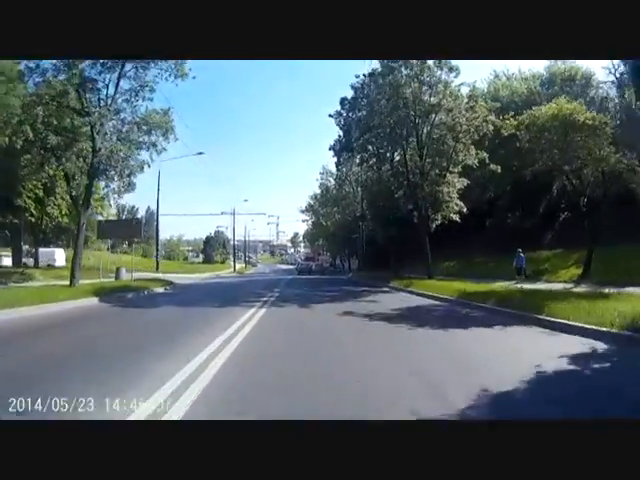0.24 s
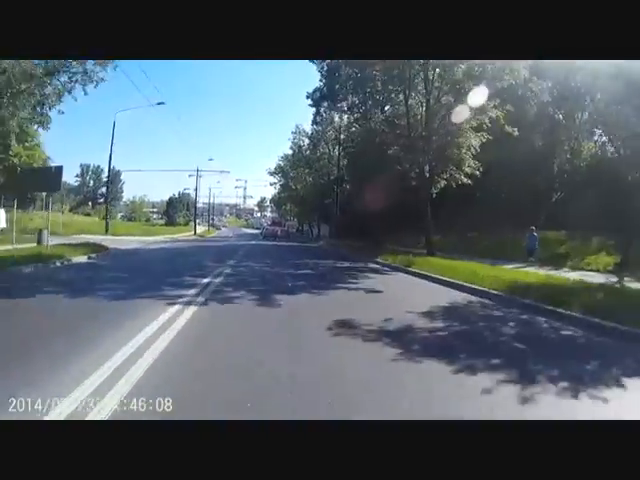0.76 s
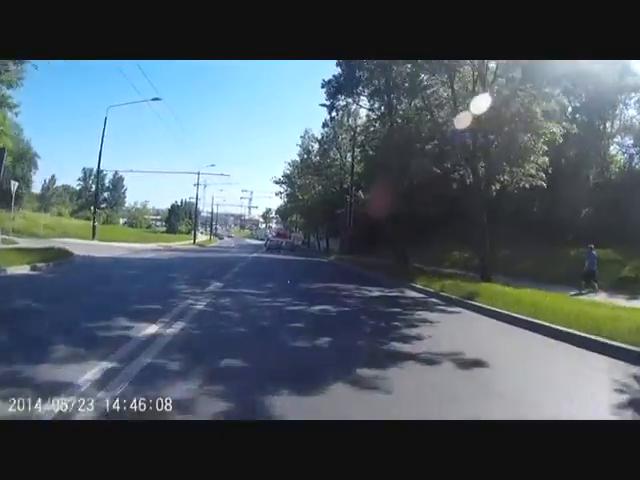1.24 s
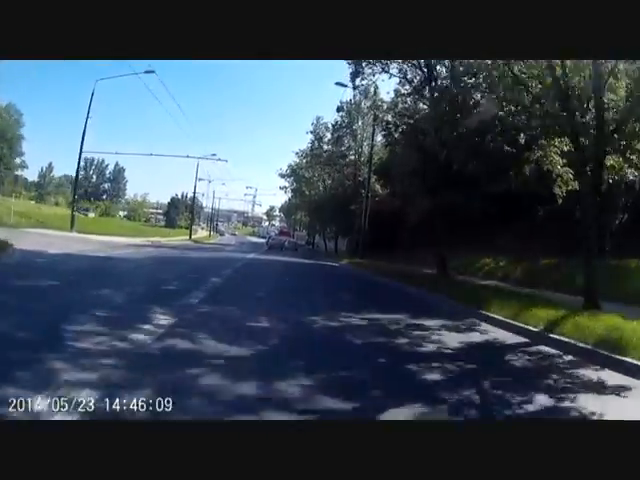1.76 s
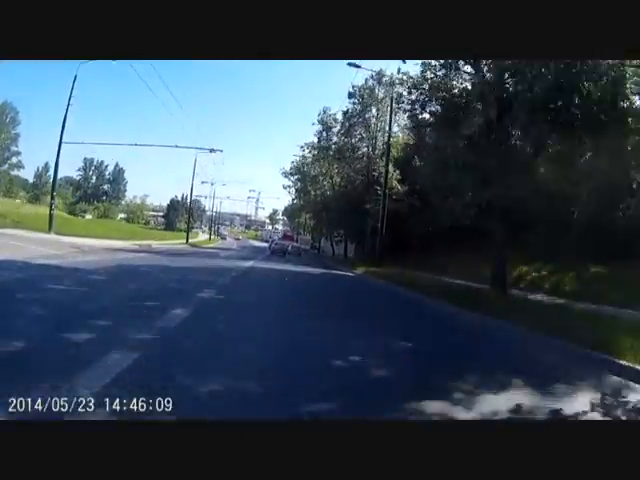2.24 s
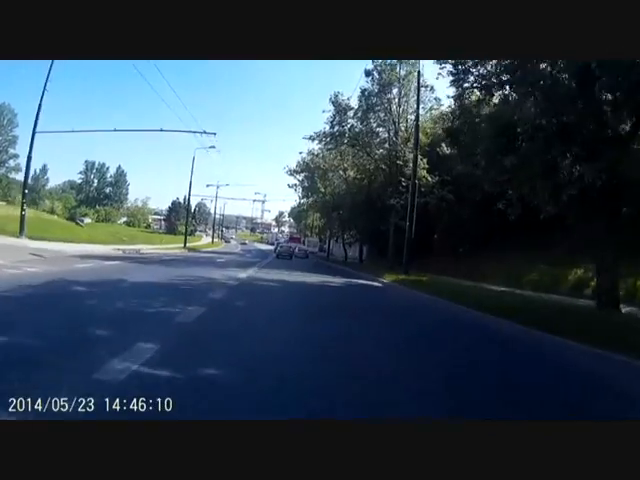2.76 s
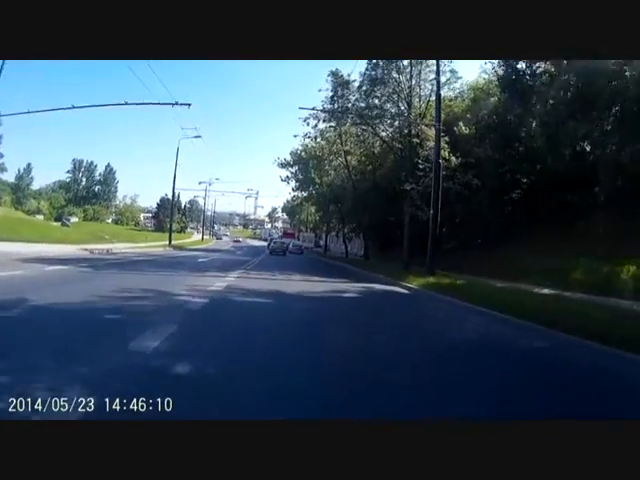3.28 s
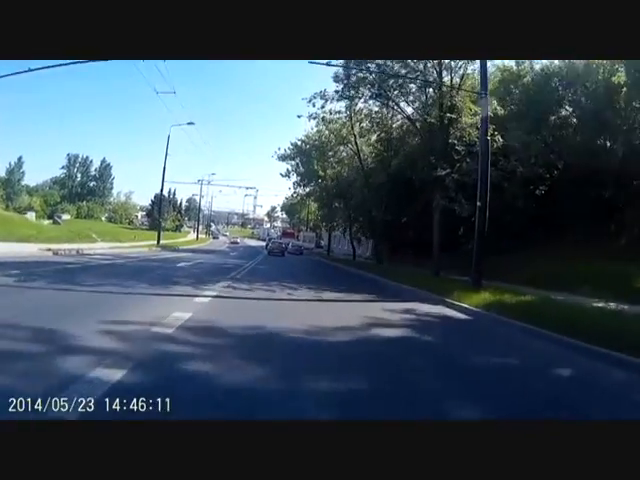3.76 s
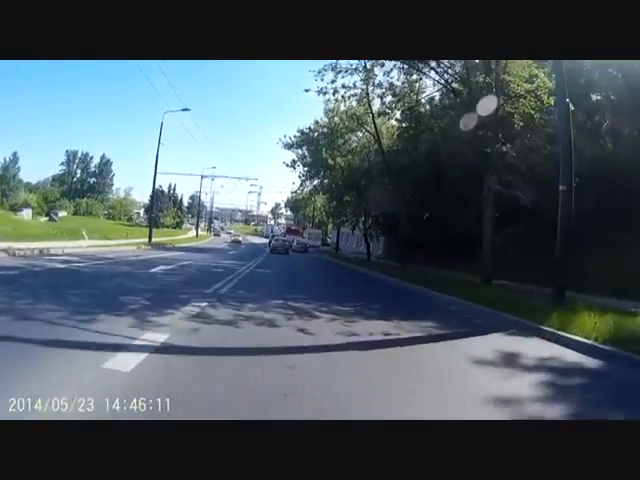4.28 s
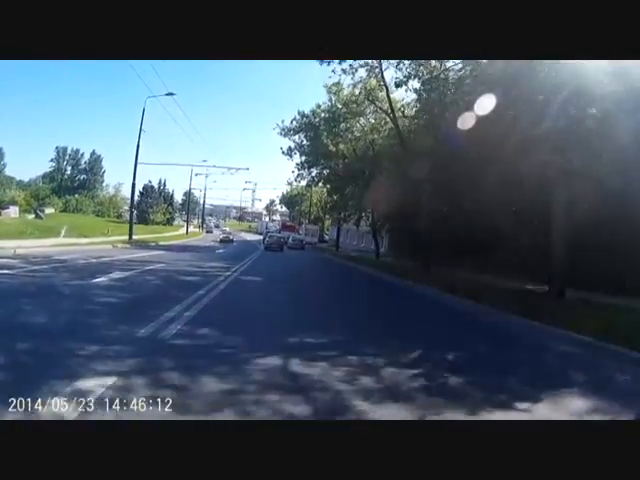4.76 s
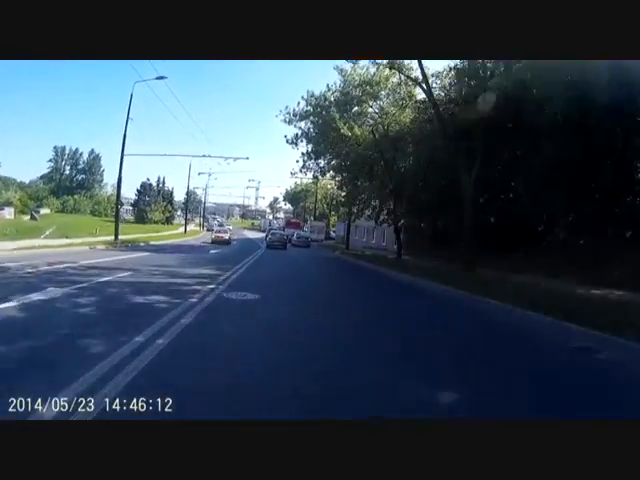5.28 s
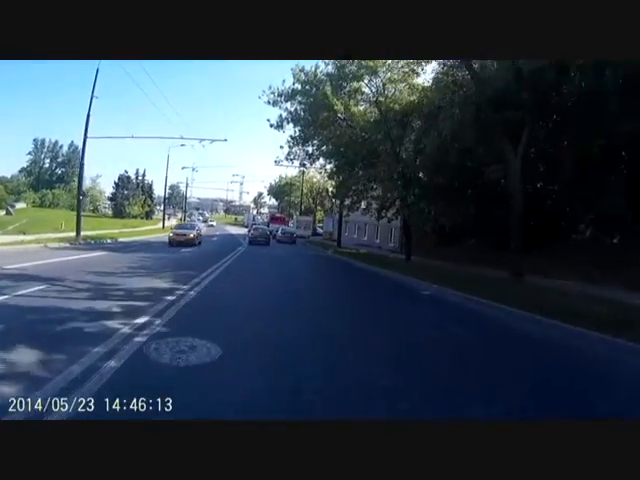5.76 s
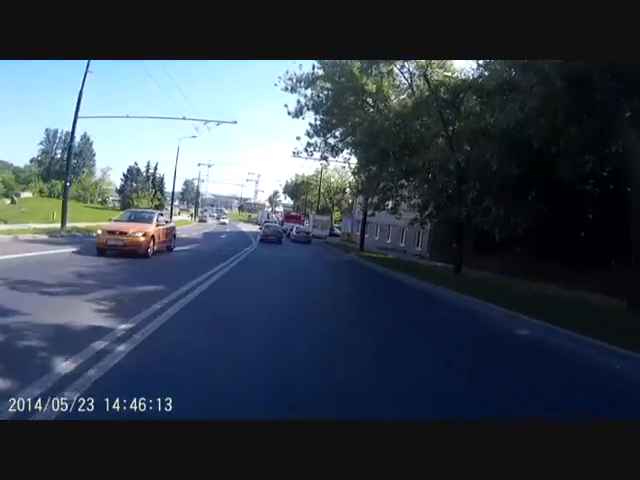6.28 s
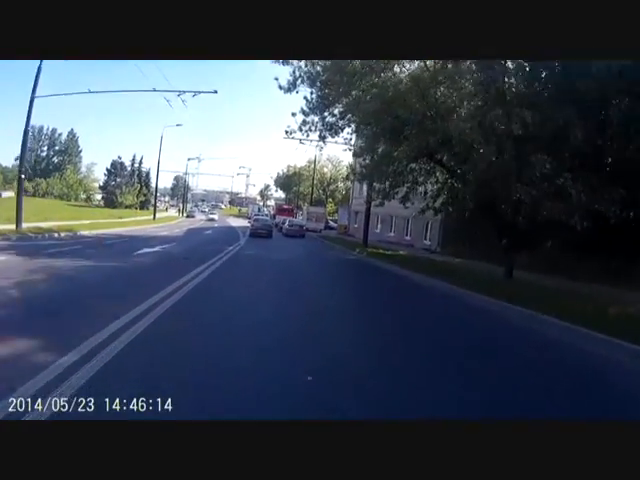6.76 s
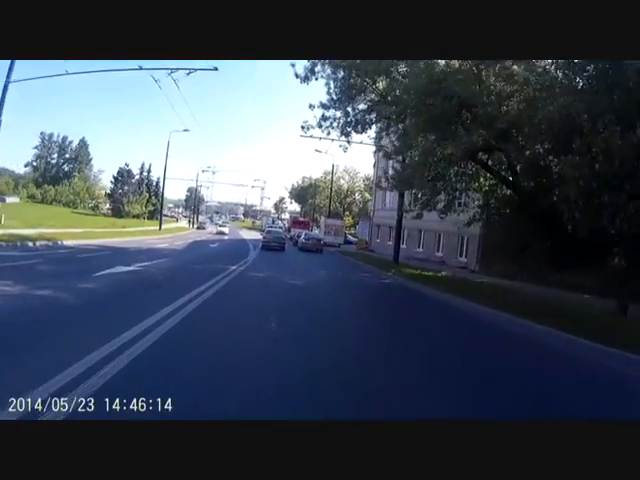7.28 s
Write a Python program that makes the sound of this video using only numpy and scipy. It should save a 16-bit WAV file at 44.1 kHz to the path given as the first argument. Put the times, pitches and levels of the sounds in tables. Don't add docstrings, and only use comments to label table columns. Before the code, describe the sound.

Hollow, fluttering roar of headwind and tyres on asphalt heard from a bicycle-mounted camera, swelling as an oncoming car passes, with a sharp grit knock.

```python
import sys
import numpy as np
from scipy import signal
from scipy.fft import rfft, irfft, next_fast_len
from scipy.io import wavfile
from scipy.ndimage import uniform_filter1d, map_coordinates

SR = 44100
rng = np.random.default_rng(int(sys.argv[2]) if len(sys.argv) > 2 else 0)


def generate_wav(signal):
    frames = np.transpose(np.atleast_2d(signal))
    scaled = np.clip(frames, -1, 1) * 32767
    pcm = np.round(scaled).astype(np.int16)
    wavfile.write(sys.argv[1], SR, pcm)


def attenuation_scalar(level_db):
    decades = np.asarray(level_db, float) / 20
    return 10 ** decades


N = 332205

# (centre [Hz], width [Hz], level [dB])
CAVITY_MODES = [(1138, 450, -20.5), (1421, 175, 0.5), (1494, 136, 2.5), (1577, 127, -1), (1734, 270, -10)]
PANEL_MODES = [(2006, 130, -2), (3555, 170, 2), (3910, 220, 1.5), (4310, 260, -1.5), (4665, 220, -4)]
FRAME_MODES = [(279, 81, -9), (522, 87, -7), (798, 65, 0), (1130, 77, -3)]
LID_MODES = [(2922, 114, 2), (2964, 280, -9)]
SNAP_MODES = [(2156, 460, 3), (2980, 600, 2.5), (3590, 650, 3.5), (4400, 600, -5), (5670, 810, -14)]
KNOCK_MODES = [(90, 160, 5.5), (170, 164, 5), (570, 256, 7), (790, 340, 0), (1060, 170, -2)]
TICK_MODES = [(3710, 360, 20), (5600, 700, 6), (7160, 520, 3), (8500, 3100, -8), (11800, 2500, 0)]
SQUEAL_MODES = [(7400, 260, 3), (8100, 600, -7), (9800, 600, 0), (11500, 600, -5), (13100, 700, -4),
                (14800, 600, -7)]

# (frequency [Hz], density [dB per Hz])
PANEL_BED = [(1120, -42), (1900, -7.5), (2430, -7.5), (2970, -4), (3450, -9.5), (5600, -19), (7280, -44),
             (12300, -120)]
FRAME_BED = [(65, -46), (110, -5), (503, -3), (661, -7), (799, -4), (1050, -11), (1360, -22), (2310, -120)]
MOUNT_SPECTRUM = [(26, -55), (45, -2.5), (59, -2), (86, -0.5), (124, -13.5), (220, -12.5), (290, -23),
                  (480, -120)]
BUFFET_SPECTRUM = [(12, -9), (20, -2), (28, 2), (38, 0.5), (50, -19), (80, -53)]
CIRCUIT_SPECTRUM = [(2940, -30), (5000, -7), (5440, -5), (6400, -5.5), (11400, -7.5), (12400, -7.5),
                    (13400, -7.5), (15500, -11)]

# (frequency [Hz], level [dB rms])
WHINE_TONES = [(9410, -97), (9483, -91), (9556, -90), (9629, -97)]

# (time [s], level [dB])
ASPHALT_DB = [(0, -70), (.5, -70), (.85, -75.5), (1.4, -69.5), (2.45, -70), (3, -66.5), (3.67, -69.5),
              (4.06, -66.5), (4.53, -71.5), (4.75, -62), (5.1, -56), (5.8, -56.5), (6.5, -55.5),
              (7.05, -57), (7.2, -59.5), (7.53, -58.5)]
# (start [s], length [s], lift [dB])
ROUGH_PATCHES = [(.06, 0.092, 5), (0.412, 0.055, 2.5), (0.613, 0.13, 4), (1.12, 0.2, 1.5), (1.462, 0.13, 5),
                 (1.646, .09, 3), (1.804, 0.27, 6), (2.115, .12, 6), (2.364, 0.057, 4), (2.506, 0.28, 6),
                 (2.585, 0.052, 4), (2.9, 0.084, 1.5), (3.182, 0.29, 5), (3.467, 0.15, 3.5), (3.731, .3, 7),
                 (4.109, 0.24, 10), (4.348, 0.11, 7.5), (4.607, 0.07, -1), (4.789, 0.12, 3.5),
                 (5.133, 0.25, 3.5), (5.402, 0.089, 1), (5.498, 0.14, 3), (5.65, 0.14, 1.5),
                 (5.95, 0.079, 1.5), (6.2, .12, 1), (6.388, 0.14, 2), (6.66, 0.18, 3), (6.95, 0.062, 1.5),
                 (7.318, 0.095, 4.5)]
# (time [s], strength [dB])
GUSTS_DB = [(0, -59), (.45, -61), (.8, -72), (1.05, -60.5), (1.4, -59.5), (1.8, -49.5), (2.15, -50),
            (2.4, -56.5), (3.15, -54), (3.45, -62), (3.8, -57), (4.25, -51), (4.65, -51), (4.85, -60.5),
            (5.7, -62), (6.4, -55.5), (6.9, -52.5), (7.53, -50)]
# (time [s], gain [dB])
HEADWIND_DB = [(0, -1.5), (.6, 0.5), (.9, 0.5), (1.5, 0.5), (1.95, 1.5), (2.4, 1), (3.3, -0.5),
               (3.65, -1.5), (4.2, 0), (4.55, -1.5), (5.1, 0), (5.7, 2), (6.2, 2), (7, 3.5), (7.25, 1.5),
               (7.53, 2.5)]
# (start [s], length [s], gain [dB])
EDDIES = [(1.926, 0.051, 3.5), (4.13, 0.044, 2), (4.25, 0.031, 3), (5.026, 0.036, 2.5),
          (5.053, 0.027, -6.5), (5.191, 0.033, -8), (5.23, .03, 2.5), (5.312, .03, 3.5), (5.587, 0.034, -5),
          (5.657, 0.047, 2.5), (6.28, 0.025, 2.5), (6.353, .03, -5.5), (6.676, 0.033, -3.5),
          (6.718, 0.031, 2), (6.81, .03, 1.5), (6.973, 0.058, 3), (7.417, 0.044, -4)]
# (time [s], peak level [dB], frequency [Hz])
BUMP_SWINGS = [(.287, -33.5, 75.5), (.338, -36.5, 234), (0.347, -31.5, 48), (0.357, -41, 150),
               (0.384, -39, 170), (0.39, -39, 90), (0.402, -49, 200), (0.457, -41, 480), (1.546, -39.5, 75),
               (5.92, -40, 45), (6.275, -27, 54.6), (6.941, -41, 59.6)]
# (time [s], snap level [dB], knock re snap [dB], cavity ring re snap [dB], tick re snap [dB])
GRIT_HITS = [(.1376, -62, -25, -25, 11), (.178, -48, 2, -10, -20), (.4218, -39.5, -4, 8, -5.5),
             (.443, -53.5, 4.5, -2, -20), (.468, -47, -5, -5, -20), (3.819, -47, -10, -8, -20),
             (6.286, -51, 13.5, 2, -17), (6.426, -51.5, 12.5, 0, -20), (6.438, -45.5, 7, 0, -15),
             (6.628, -13.5, -12.5, 13, -29), (6.636, -32, -22, -20, -20)]

QUIET_DB = -65
AIR_DB, AIR_FOLLOWS = -45.5, 0.9
LID_DB, LID_FOLLOWS = -63, 0.89
DRONE_DB, DRONE_FOLLOWS, FRAME_RINGS_FOLLOWS = -54.5, 0.5, 0.3
SHAKE_DB, SHAKE_FOLLOWS, SHAKE_PER_GUST_DB = -58, 0.1, 0.11
TYRE_EDGE_S, SHAKE_DECAY_S = 0.026, 0.066
EDDY_EDGE_S = 0.017
ABREAST_S, CAR_GAP_M, CLOSING_M_PER_S, LEAVING_M_PER_S = 6.59, 3.7, 15.9, 11.2
CAR_AIR_DB, CAR_SHAKE_DB, CAR_HISS_DB = -29, -64.5, -5.5
RUB_S, RUB_LENGTH_S, RUB_DB, RUB_SKIP_S, RUB_SKIP_DB = 6.69, 0.178, -60.5, 6.76, -6
CONTACT_HZ = 4560
HISS_FLOOR_DB, HISS_AIR_DB, HISS_FOLLOWS_AIR = -72, -69, 0.62
TOP_HZ = 15740


def unit(x):
    return x / np.sqrt(np.mean(x ** 2) + 1e-20)


def curve(rows):
    s, value = np.transpose(rows)
    return np.interp(np.arange(N) / SR, s, value)


def wobble(rate_hz):
    knots = rng.standard_normal(int(N * rate_hz / SR) + 4)
    return map_coordinates(knots, [np.arange(N) * rate_hz / SR])


def plateau(start_s, length_s, rise_s, fall_s):
    t = np.arange(N) / SR
    rise = (t - start_s) / rise_s
    fall = (start_s + length_s - t) / fall_s
    return np.clip(np.minimum(rise, fall) + .5, 0, 1)


def filtered(x, response):
    m = next_fast_len(N + SR // 2)
    return irfft(rfft(x, m) * response(np.fft.rfftfreq(m, 1 / SR)), m)[:N]


def shape(points):
    f, db = np.transpose(points)
    return lambda hz: attenuation_scalar(np.interp(np.log(hz + 1), np.log(f + 1), db))


def modes(table):
    def response(hz):
        total = 0
        for k, (centre, width, db) in enumerate(table):
            band = 1j * hz * width / (centre * centre - hz * hz + 1j * hz * width)
            total = total + (-1) ** k * attenuation_scalar(db) * band ** 2
        return total
    return response


def noise(response, patchy_db):
    z = signal.stft(rng.standard_normal(N), nperseg=512)[2]
    field = uniform_filter1d(rng.standard_normal(z.shape), size=5, axis=0)
    field = uniform_filter1d(field, size=10, axis=1)
    patchy = signal.istft(z * attenuation_scalar(patchy_db * unit(field)), nperseg=512)[1][:N]
    return unit(filtered(patchy, response))


def cavity(texture):
    eddy_db = sum(db * plateau(s, length, EDDY_EDGE_S, EDDY_EDGE_S) for s, length, db in EDDIES)
    flutter_db = eddy_db + 0.31 * texture + 0.66 * wobble(10)
    return air(CAR_AIR_DB) * attenuation_scalar(flutter_db) * noise(modes(CAVITY_MODES), patchy_db=-0.1)


def air(car_db):
    own = attenuation_scalar(AIR_DB + AIR_FOLLOWS * shaking_db() + curve(HEADWIND_DB))
    return np.hypot(own, attenuation_scalar(car_db) * car())


def car():
    t = np.arange(N) / SR - ABREAST_S
    along_m = t * np.where(t < 0, CLOSING_M_PER_S, LEAVING_M_PER_S)
    return CAR_GAP_M / np.hypot(CAR_GAP_M, along_m)


def shaking_db():
    patch_db = sum(db * plateau(s, length, TYRE_EDGE_S, SHAKE_DECAY_S) for s, length, db in ROUGH_PATCHES)
    return curve(ASPHALT_DB) - QUIET_DB + patch_db


def panels(texture):
    bed = attenuation_scalar(4) * noise(shape(PANEL_BED), patchy_db=-1.5)
    buzz = unit(noise(modes(PANEL_MODES), patchy_db=0.0) + bed)
    return attenuation_scalar(QUIET_DB + shaking_db() + 0.37 * texture + 3.0) * buzz


def frame(texture):
    rough_db = shaking_db()
    rings = attenuation_scalar(FRAME_RINGS_FOLLOWS * rough_db) * noise(modes(FRAME_MODES), patchy_db=1.64)
    drone = unit(rings + attenuation_scalar(3.5) * noise(shape(FRAME_BED), patchy_db=-1.0))
    drone_db = DRONE_DB + DRONE_FOLLOWS * rough_db + 1.4 * wobble(9)
    return attenuation_scalar(drone_db + 0.21 * texture + 1.0) * drone


def lid(texture):
    lid_db = LID_DB + LID_FOLLOWS * shaking_db() + 0.94 * wobble(12)
    return attenuation_scalar(lid_db + 1.3 * texture - 0.8) * noise(modes(LID_MODES), patchy_db=0)


def mount():
    gust_db = curve(GUSTS_DB)
    buffet = attenuation_scalar(gust_db + 4.0) * noise(shape(BUFFET_SPECTRUM), patchy_db=-1)
    shake_db = SHAKE_DB + SHAKE_FOLLOWS * shaking_db() + SHAKE_PER_GUST_DB * (gust_db - gust_db.mean())
    shake = np.hypot(attenuation_scalar(shake_db), attenuation_scalar(CAR_SHAKE_DB) * car())
    shake = shake * attenuation_scalar(1.0 * wobble(8.2) + 3.45)
    x = buffet + shake * noise(shape(MOUNT_SPECTRUM), patchy_db=-2.0)
    t = np.arange(-SR // 10, SR // 10) / SR
    for s, db, hz in BUMP_SWINGS:
        swing = np.cos(2 * np.pi * hz * t) * np.exp(-(hz * t / 0.44) ** 2)
        x[round(s * SR) - SR // 10:][:len(t)] -= attenuation_scalar(db) * swing
    return x


def grit():
    blows = np.zeros((4, N))
    for s, db, knock_db, ring_db, tick_db in GRIT_HITS:
        blows[:, round(s * SR)] = attenuation_scalar(db + np.array([24, knock_db + 33.5, ring_db + 27.0, tick_db + 16.5]))
    snap, knock, ring, tick = blows
    body = filtered(snap, modes(SNAP_MODES)) + filtered(knock, modes(KNOCK_MODES))
    body = body + filtered(ring, modes([(1623, 170, 4.5), (2036, 210, -6)]))
    soft_contact = lambda hz: 1 / (1 + 1j * hz / CONTACT_HZ) ** 2
    return filtered(body, soft_contact) + filtered(tick, modes(TICK_MODES))


def brake_rub():
    skip_db = RUB_SKIP_DB * plateau(RUB_SKIP_S - .015, .03, .02, .02)
    touch = plateau(RUB_S, RUB_LENGTH_S, .01, 0.0095) * attenuation_scalar(RUB_DB + skip_db)
    scrape = noise(modes([(9500, 7000, 0)]), patchy_db=1.5)
    return touch * (noise(modes(SQUEAL_MODES), patchy_db=3.0) + attenuation_scalar(-9) * scrape)


def circuit_hiss(texture):
    air_ratio = air(CAR_AIR_DB + CAR_HISS_DB) / attenuation_scalar(AIR_DB)
    gain = np.hypot(attenuation_scalar(HISS_FLOOR_DB), attenuation_scalar(HISS_AIR_DB) * air_ratio ** HISS_FOLLOWS_AIR)
    spectrum = shape([(20, -12), (3000, -1)] + CIRCUIT_SPECTRUM[1:])
    return gain * attenuation_scalar(0.41 * texture + 3.5) * noise(spectrum, patchy_db=0)


def supply_whine():
    t = np.arange(N) / SR
    return sum(np.sqrt(2) * attenuation_scalar(db) * np.sin(2 * np.pi * hz * t) for hz, db in WHINE_TONES)


def scene():
    texture = unit(wobble(9.3) + 3.1 * wobble(30))
    road = panels(texture) + frame(texture) + lid(texture)
    mix = cavity(texture) + road + mount() + grit() + brake_rub() + circuit_hiss(texture)
    return mix[None]


def top_cut(x):
    return signal.sosfilt(signal.butter(12, 15880, fs=SR, output="sos"), x)


def record(dry):
    mix = filtered(dry[0] + supply_whine(), lambda hz: hz < TOP_HZ)[None]
    return top_cut(mix)


dry = scene()
out = record(dry)
generate_wav(out)
```